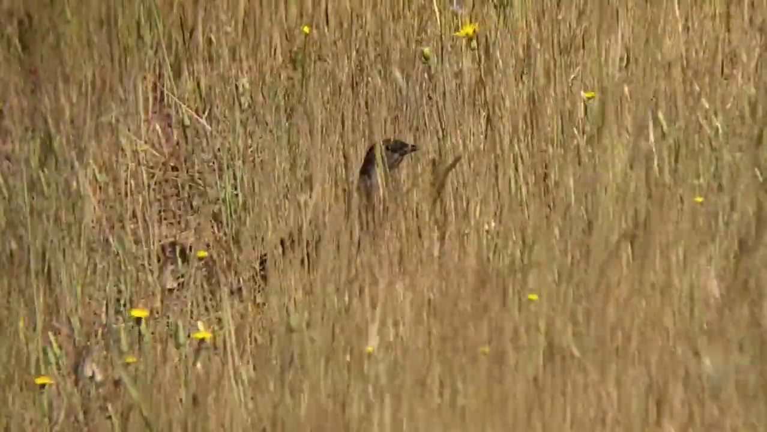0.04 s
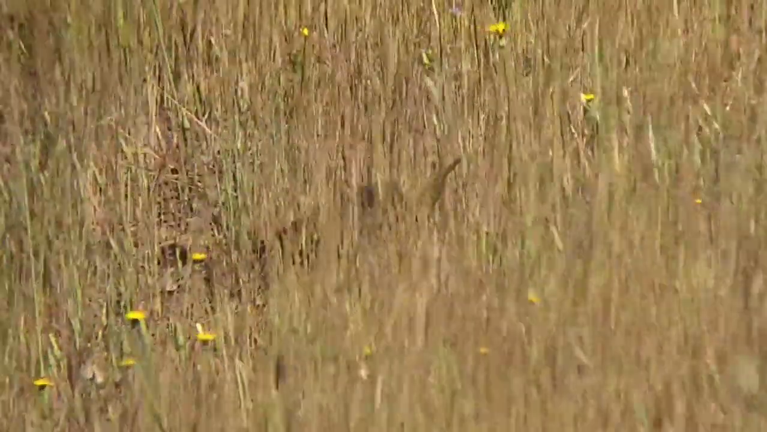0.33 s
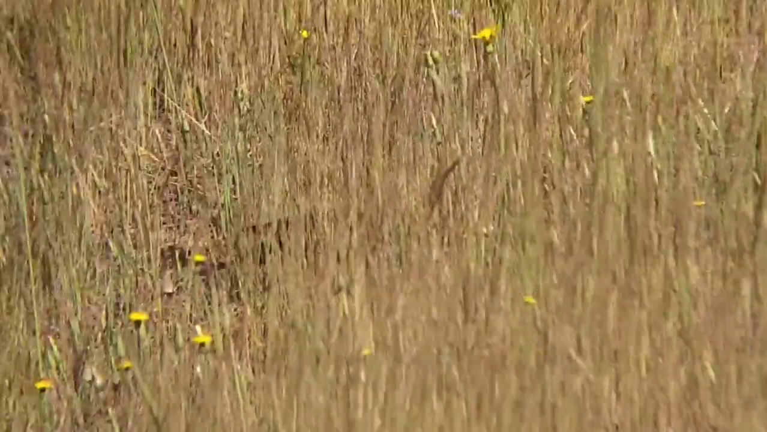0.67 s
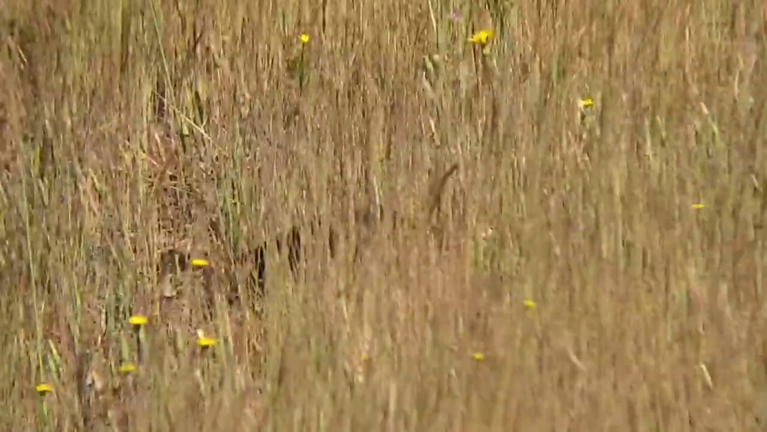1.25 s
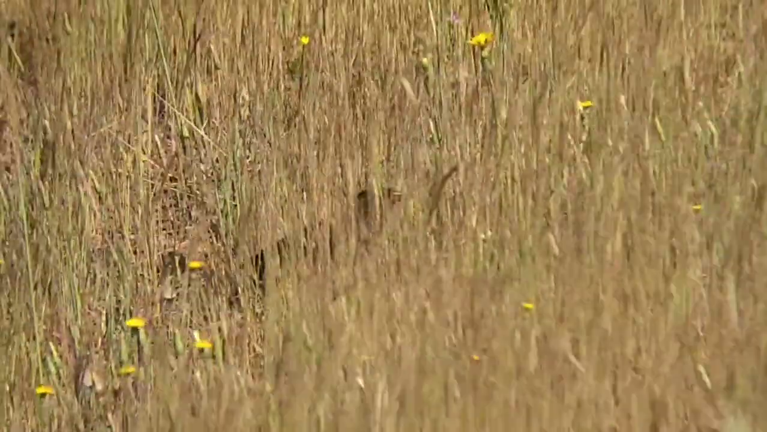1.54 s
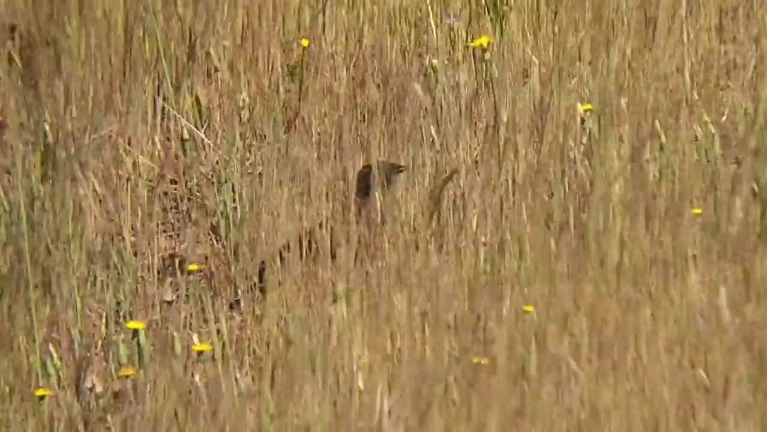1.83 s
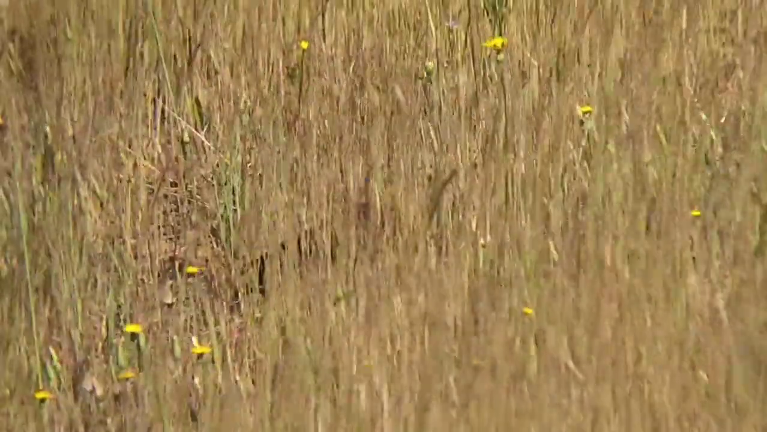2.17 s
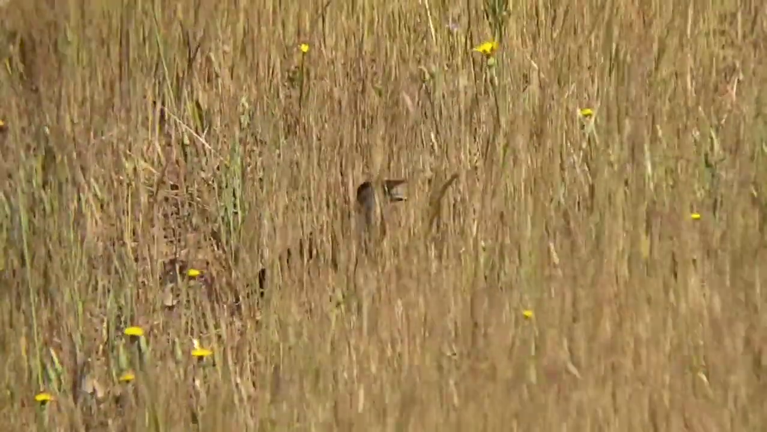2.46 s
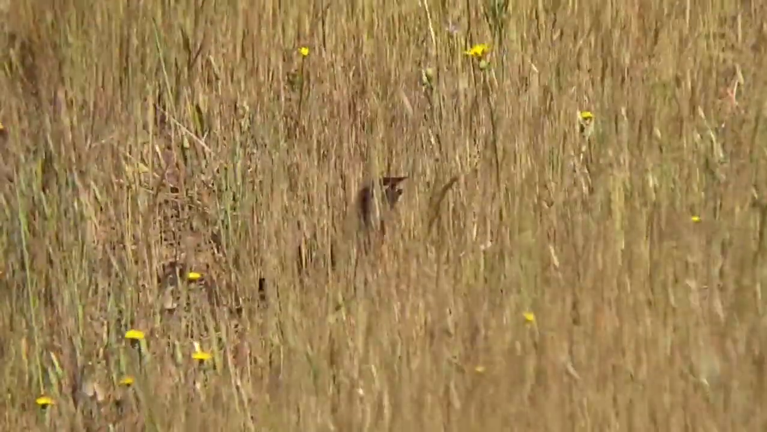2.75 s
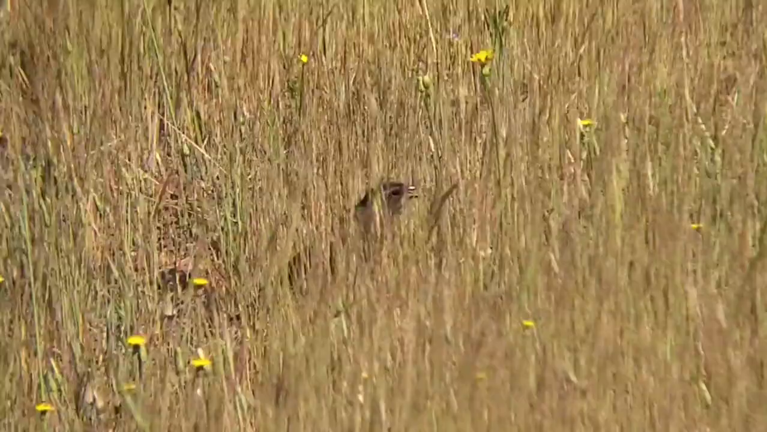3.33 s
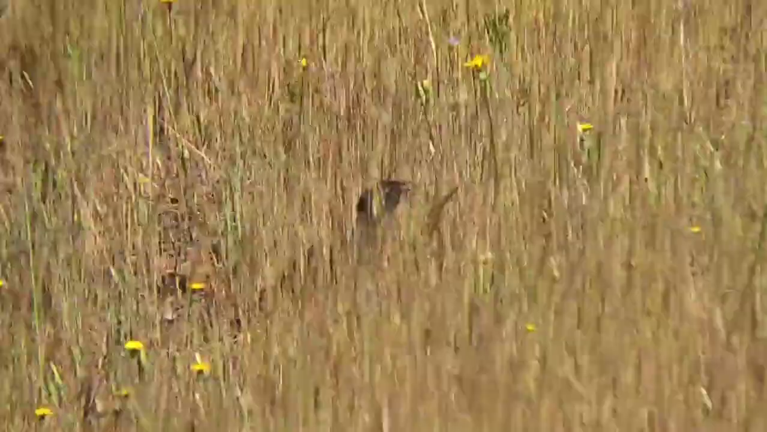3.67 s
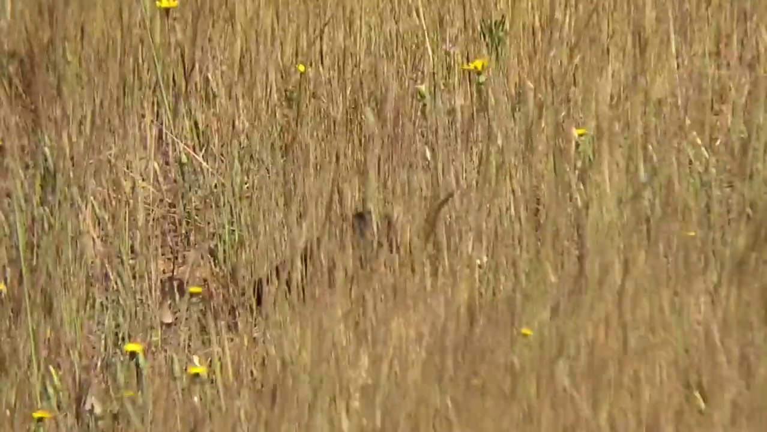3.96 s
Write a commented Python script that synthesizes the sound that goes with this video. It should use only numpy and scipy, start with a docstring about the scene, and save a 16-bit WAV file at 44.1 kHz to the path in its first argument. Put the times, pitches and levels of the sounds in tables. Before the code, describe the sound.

Sharp chips and raspy buzzes from a small bird, with faint birds and wind behind.

```python
"""A small bird in tall dry grass gives sharp chips and harsh buzzes. Each buzz is frequency modulation: one
whistle swept up and down some seventy times a second, coloured by the resonance of the throat and scattered by
the grass. Thin low peeps lead into and out of each buzz. Other birds chip and whistle far off across the
meadow. Behind them lie a steady hush, the rumble of wind on the microphone, and a distant engine that speeds up
and draws nearer."""
import sys
import numpy as np
from scipy import signal
from scipy.fft import rfft, irfft
from scipy.io import wavfile
from scipy.ndimage import uniform_filter1d

SR = 44100
rng = np.random.default_rng(int(sys.argv[2]) if len(sys.argv) > 2 else 0)


def bounce(signal):
    """Save signal as a 16-bit WAV file at the path given by the first command-line argument."""
    frames = np.transpose(np.atleast_2d(signal))
    limited = np.clip(frames, -1, 1)
    pcm = np.round(limited * 32767).astype(np.int16)
    wavfile.write(sys.argv[1], SR, pcm)


N = 176400
T = np.arange(N) / SR
FREQS = np.arange(N // 2 + 1) * SR / N
SIDES = np.array([[1], [-1]])  # left, right
JITTER_HZ, FLUTTER_DB = 900, 2.2  # birdsong: bandwidth of pitch jitter, spread of level flutter


def from_db(db):
    """Amplitude ratio: tenfold for every 20 dB."""
    return 10 ** (np.asarray(db) / 20)

def rms_one(x):
    """Normalisation to unit mean power."""
    return x / np.sqrt(np.mean(x ** 2) + 1e-20)

def in_time(rows):
    """Linear interpolation in time of each column after the first."""
    times, *columns = np.transpose(rows)
    return [np.interp(T, times, column) for column in columns]

def in_frequency(points):
    """Interpolation of a spectrum on a logarithmic frequency axis."""
    hz, value = np.transpose(points)
    return np.interp(np.log(FREQS + 1), np.log(hz), value)

def during(rows):
    """Trapezoidal window over a curve's span, with 3.6 ms ramps."""
    return np.clip(np.minimum(T - rows[0][0], rows[-1][0] - T) / 0.0036, 0, 1)

def drift(bandwidth_hz):
    """Random modulation: low-pass Gaussian noise of unit rms."""
    return rms_one(irfft(rfft(rng.standard_normal(N)) / (1 + (FREQS / bandwidth_hz) ** 2), N))

def phase_of(hz):
    """Phase is the time integral of angular frequency."""
    return 2 * np.pi * np.cumsum(hz) / SR

def air_noise(spectrum):
    """Partial coherence: coloured stereo noise of unit rms, alike in the bass, unrelated in the treble."""
    # likeness of left and right: (frequency [Hz], correlation [-1 to 1])
    correlation = [(30, 0.018), (120, 0.66), (300, 0.83), (600, 0.68), (1000, -0.041), (1600, 0.11),
                   (2600, -0.069), (5000, -0.036), (12000, -0.076)]
    alike = in_frequency(correlation)
    mid, side = rfft(rng.standard_normal((2, N)))
    stereo = np.sqrt(1 + alike) * mid + np.sqrt(1 - alike) * side * SIDES
    band_limits = 1 / (1 + (FREQS / (2 * spectrum[-1][0])) ** 4) * FREQS / (FREQS + 10)
    return rms_one(irfft(band_limits * from_db(in_frequency(spectrum)) * stereo, N))

def scatter(x, t60_s):
    """Scattering by stems and ground: convolution with decaying echoes, different at each ear."""
    t = T[:SR]
    echoes = rng.standard_normal((2, SR)) * from_db(-60 * t / t60_s) * (1 - np.exp(-t / 0.001))
    echoes /= np.sqrt(np.sum(echoes ** 2, axis=1, keepdims=True))
    return signal.fftconvolve(np.atleast_2d(x), echoes, axes=1)[:, :N]

def hush():
    """Stationary noise: the far hush of open country, slightly to the right."""
    # hush spectrum: (frequency [Hz], relative density [dB])
    spectrum = [(88, -26), (150, -6.5), (182, -12.5), (396, -8), (572, -18), (722, -4.5), (1340, -6),
                (2360, -17.5), (3220, -23), (3690, -26.5), (6470, -36.5), (7410, -41), (8830, -65.5),
                (12000, -48.5), (15500, -63.5)]
    return from_db(-48.5 - .5 * SIDES) * air_noise(spectrum)

def wind():
    """Turbulence on the microphone: low-frequency noise, amplitude-modulated by gusts."""
    # gust envelope: (time [s], relative level [dB])
    gusts = [(0.0, -25.5), (0.3, -50), (0.37, -29), (0.43, -50.5), (0.54, -29), (0.67, -40), (0.73, -23.5),
             (0.76, -43), (0.88, -24), (0.96, -47), (1.07, -37), (1.22, -49.5), (1.27, -33.5), (1.54, -56),
             (1.58, -27.5), (1.75, -32.5), (1.8, -43), (1.94, -31), (2.24, -45), (2.47, -28), (2.49, -32.5),
             (2.91, -38.5), (3.49, -30), (3.62, -25.5), (3.75, -35.5), (4.0, -31)]
    # rumble spectrum: (frequency [Hz], relative density [dB])
    spectrum = [(20, -8), (35, -8.5), (55, 2), (75, 1), (105, -10), (150, -23), (250, -29), (500, -44.5)]
    gain_db, lump_db = -1.5, 1.5
    return from_db(gain_db + in_time(gusts)[0] + lump_db * drift(14)) * air_noise(spectrum)

def vehicle():
    """Engine orders, multiples of half the firing rate, rise together while tyre noise swells."""
    # engine speed: (time [s], firing rate [Hz])
    firing = [(2.2, 58), (2.53, 67), (2.66, 76), (2.85, 86), (3.11, 98), (3.35, 102.5), (3.6, 106),
              (3.8, 111), (4.0, 119)]
    # engine envelope: (time [s], level [dB])
    engine_level = [(2.2, -49.5), (2.55, -43.5), (2.8, -35.5), (3.1, -36), (3.35, -41), (3.6, -39),
                    (3.8, -41), (4.0, -38.5)]
    # engine orders: (multiple of the firing rate [ratio], relative level [dB])
    orders = [(.5, -5), (1, 2.5), (1.5, -17.5), (2, -13), (2.5, -19), (3, -16), (3.5, -23)]
    # tyre and road noise envelope: (time [s], level [dB])
    road_level = [(0, -65), (1.4, -57), (2.2, -51.5), (2.8, -48), (3.4, -44), (3.75, -40.5), (4.0, -39.5)]
    # tyre and road noise spectrum: (frequency [Hz], relative density [dB])
    road_spectrum = [(40, -15.5), (110, -7), (180, 1), (280, -2.5), (400, -10), (600, -10), (1200, -12),
                     (2200, -16), (4000, -23.5), (7000, -36), (10000, -55.5), (15000, -47.5)]
    phase = phase_of(in_time(firing)[0] * (1 + .004 * drift(6.37)))
    note = 0
    for order, db in orders:
        flicker_db = (1.25 if order == 1 else 2.5) * drift(3)
        note += from_db(db + flicker_db) * np.sin(order * phase + rng.uniform(0, 2 * np.pi))
    road = from_db(in_time(road_level)[0]) * air_noise(road_spectrum)
    return np.sqrt(2) * from_db(in_time(engine_level)[0]) * note + road

def faint_calls():
    """Frequency-modulated tones, blurred by reverberation: chips, trills and a long falling whistle from far
    off, and thin low peeps leading into and out of the near bird's buzzes."""
    # arched chips: (centre time [s], top pitch [Hz], peak level [dB])
    arches = [(.035, 2780, -54), (0.138, 2660, -55.5), (0.187, 2830, -55), (.295, 2690, -58),
              (0.342, 2840, -53.5), (0.594, 3030, -61), (0.716, 5210, -58.5), (0.854, 5320, -58.5),
              (.94, 5100, -65), (1.011, 5160, -61), (1.16, 5140, -60), (1.305, 5010, -61),
              (1.399, 3440, -61), (1.473, 4950, -54), (1.549, 3510, -61), (1.635, 5060, -52),
              (1.734, 5970, -70), (1.83, 6550, -66), (1.924, 6090, -60)]
    # whistles and trills, with thin low peeps around the near bird's buzzes: (onset [s], length [s], # first
    # pitch [Hz], last pitch [Hz], peak level [dB], trill depth [Hz])
    notes = [(.17, 0.05, 2200, 2220, -54.5, -4), (0.284, 0.028, 4440, 4500, -62, 0),
             (0.365, 0.032, 3335, 3250, -52, -4), (0.389, 0.081, 2860, 3080, -50, -3),
             (0.53, 0.045, 6550, 6480, -73, 2), (0.558, 0.05, 5370, 5330, -70, -3),
             (0.627, 0.082, 2800, 2580, -59.5, -2), (0.752, .065, 4150, 3750, -54.5, 400),
             (.925, 0.038, 2820, 2800, -54, -4), (0.962, 0.082, 5320, 5300, -65, 5),
             (1.725, 0.18, 4440, 4300, -62, 444), (1.935, 0.079, 4430, 3650, -58.5, 449),
             (2.023, 0.095, 3790, 3350, -50.5, 266), (2.468, 0.075, 4220, 3750, -51, 142),
             (2.632, 0.04, 2730, 2760, -55.5, -2), (2.721, 0.035, 2820, 2650, -47.5, 2),
             (2.907, 0.029, 2790, 2686, -47.5, 5), (3.019, 0.034, 2650, 2900, -46.5, 0),
             (3.07, 0.048, 2810, 2740, -47.5, -1), (3.44, 0.096, 5620, 5600, -56.5, -5),
             (3.523, 0.043, 2760, 2700, -53, 0), (3.741, 0.028, 2930, 2900, -49, 19),
             (3.857, 0.028, 2750, 2820, -53, -4)]
    # falling whistle: (time [s], pitch [Hz], level [dB])
    falling = [(3.155, 5800, -60), (3.18, 5850, -40), (3.215, 5420, -63), (3.27, 4750, -48),
               (3.31, 4250, -49), (3.38, 3560, -47), (3.44, 3356, -40.5), (3.515, 3304, -46),
               (3.545, 3300, -66)]
    chip_s, trills_per_s = .044, 57
    song, waver, jitter = np.zeros(N), 1 + .0031 * drift(210), drift(JITTER_HZ)
    for centre, top_hz, db in arches:
        span = np.abs(T - centre) < chip_s / 2
        offset = 2 * (T[span] - centre) / chip_s
        hz = top_hz * (1 - .22 * offset ** 2 + .015 * jitter[span])
        song[span] += from_db(db) * np.cos(np.pi / 2 * offset) * np.sin(phase_of(hz))
    for onset, length, first_hz, last_hz, db, trill_hz in notes:
        span = (T > onset) & (T < onset + length)
        progress = (T[span] - onset) / length
        trill = np.sin(2 * np.pi * trills_per_s * length * progress) + .6 * jitter[span]
        hz = first_hz + (last_hz - first_hz) * progress + trill_hz * trill
        envelope = from_db(db) * np.sqrt(np.abs(np.sin(np.pi * progress)))
        song[span] += envelope * np.sin(phase_of(hz * waver[span]))
    hz, db = in_time(falling)
    song += from_db(db) * during(falling) * np.sin(phase_of(hz * waver))
    return song + from_db(-3.5) * scatter(song, t60_s=.26)

def throat(source):
    """Source-filter model: the throat resonates, the bill damps the treble; the rms is then held near 1."""
    centre_hz, width_hz, throat_leak = 4650, 900, .7
    bill_cut_hz, bill_leak = 5050, .25
    radius = np.exp(-np.pi * width_hz / SR)
    feedback = [1, -2 * radius * np.cos(2 * np.pi * centre_hz / SR), radius ** 2]
    resonance = signal.lfilter(np.array([1, 0, -1]) * (1 - radius ** 2) / 2, feedback, source)
    bill = bill_leak + (1 - bill_leak) / (1 + (FREQS / bill_cut_hz) ** 20)
    voice = irfft(rfft(throat_leak * source + resonance) * bill, N)
    power = np.abs(uniform_filter1d(voice ** 2, size=900))
    return voice / np.sqrt(power + 1e-9)

def air_leak(envelope, db):
    """Power law for the rasp's amplitude: harder notes leak disproportionately more air."""
    reference_db, growth = -43, .75
    return from_db(db) * envelope * (envelope / from_db(reference_db)) ** growth

def chips():
    """Pitch arches with period doubling. Returns the tone and the envelopes of rasp and hiss."""
    # near chips: (apex time [s], length [s], top pitch [Hz], tone level [dB], relative overtone [dB],
    # relative rasp [dB], hiss level [dB], pitch jitter [fraction])
    calls = [(2.217, 0.015, 4850, -44.5, -5.5, -17, -84, 0.1),
             (2.339, 0.018, 4860, -43, -2.5, -16.5, -64, 0.07),
             (2.45, .025, 4900, -35, -14, -19, -56.5, .05),
             (2.566, .029, 5054, -33, -13.5, -24.5, -56.5, 0.09),
             (3.905, 0.027, 4700, -38.5, -13, -15, -69, 0.06)]
    rise_share, pitch_drop, undertone_db = .44, .25, -15.5
    tone, rasp, hiss = 0, 0, 0
    jitter, flutter = drift(JITTER_HZ), from_db(FLUTTER_DB * drift(300))
    for apex, length, top_hz, db, overtone_db, rasp_db, hiss_db, roughness in calls:
        offset = np.abs(T - apex) / (length * np.where(T < apex, rise_share, 1 - rise_share))
        arch = 1 - pitch_drop * offset ** 2 * np.exp(1 - offset ** 2)
        phase = phase_of(top_hz * arch * (1 + roughness * jitter))
        partials = from_db(undertone_db) * np.sin(phase / 2) + from_db(overtone_db) * np.sin(1.5 * phase)
        shape = np.exp(-np.minimum(offset, 20) ** 1.4) * flutter
        tone += from_db(db) * shape * (throat(np.sin(phase)) + np.sqrt(2) * partials)
        rasp += air_leak(from_db(db) * shape, rasp_db)
        hiss += from_db(hiss_db) * shape
    return tone, rasp, hiss

def buzzes():
    """Frequency modulation, slow up and fast down. Returns the tone, its octave and the rasp envelope."""
    # sweep range, a curve per buzz: (time [s], top [Hz], bottom [Hz], sweep rate [1/s])
    sweeps = [
        [(2.659, 7400, 4170, 55), (2.70, 5710, 3200, 68), (2.745, 4840, 3260, 72), (2.80, 4780, 3020, 80),
         (2.86, 4750, 2916, 79), (2.935, 4170, 2850, 58)],
        [(3.033, 6530, 3700, 61), (3.06, 4996, 3500, 64), (3.11, 4910, 3610, 81), (3.16, 4650, 3267, 73),
         (3.24, 4094, 3016, 68), (3.47, 3655, 2723, 76)],
        [(3.608, 6720, 4220, 79), (3.64, 5500, 3810, 64), (3.665, 4560, 3580, 62), (3.74, 4060, 2945, 50)],
    ]
    # envelope, a curve per buzz: (time [s], relative level [dB])
    efforts = [
        [(2.65, -72), (2.664, -38.5), (2.678, -39), (2.706, -40), (2.712, -38.5), (2.768, -44), (2.81, -43),
         (2.912, -45.5), (2.945, -73)],
        [(3.025, -63), (3.047, -42), (3.157, -39.5), (3.241, -42.5), (3.323, -41.5), (3.345, -45.5),
         (3.445, -46), (3.47, -56)],
        [(3.6, -66), (3.612, -41), (3.66, -40.5), (3.666, -44.5), (3.704, -41.5), (3.745, -63)],
    ]
    # timbre, a row per buzz: (relative octave [dB], relative rasp [dB])
    colours = [(-23, -14), (-13, -14), (-30, -14)]
    rise_share, trough_db, gain_db = .7, -3.5, -.5
    tone, octave, rasp, jitter = 0, 0, 0, drift(JITTER_HZ)
    for sweep, effort, (octave_db, rasp_db) in zip(sweeps, efforts, colours):
        top, bottom, rate = in_time(sweep)
        cycle = np.cumsum(rate * (1 + .04 * drift(80)) * (T >= sweep[0][0])) / SR % 1
        ramp = np.interp(cycle, [0, rise_share, 1], [0, 1, 0])
        height = np.sin(np.pi / 2 * ramp ** 1.2) ** 2  # rounds the turning points
        hz = bottom + (top - bottom) * height * (1 + .07 * drift(128))
        phase = phase_of(hz * (1 + .03 * jitter))
        pulse = from_db(trough_db * (2 - height) + FLUTTER_DB * drift(200))
        envelope = from_db(gain_db + in_time(effort)[0]) * during(effort)
        tone += envelope * throat(pulse * np.sin(phase))
        octave += envelope * pulse * np.sin(2 * phase) * from_db(octave_db) / (1 + (hz / 4500) ** 20)
        rasp += air_leak(envelope, rasp_db)
    return tone, octave, rasp

def near_bird():
    """Direct and scattered sound: chips and buzzes with airy rasp and hiss, echoed by grass and field."""
    # rasp spectrum: (frequency [Hz], relative density [dB])
    rasp_spectrum = [(800, -1.5), (2300, 7.5), (4500, 7), (5800, -1.5), (7300, 0), (8700, -4),
                     (9800, -20.5), (15500, -32)]
    # hiss spectrum: (frequency [Hz], relative density [dB])
    hiss_spectrum = [(7000, -32), (9500, -2), (11500, -1), (13000, -3), (15000, 1), (16000, 0.5)]
    # hiss envelope, a curve per buzz: (time [s], relative level [dB])
    hiss_levels = [
        [(2.65, -89), (2.672, -69), (2.716, -64), (2.776, -79), (2.945, -83)],
        [(3.025, -84), (3.051, -67), (3.105, -63), (3.279, -77), (3.47, -81)],
        [(3.6, -82), (3.626, -71), (3.648, -69), (3.666, -79), (3.745, -82)],
    ]
    left_lag_s, tone_pan_db, treble_pan_db = .00002, -.2, 1.5
    chip, chip_rasp, chip_hiss = chips()
    buzz, octave, buzz_rasp = buzzes()
    buzz_hiss = sum(from_db(5.5 + in_time(curve)[0]) * during(curve) for curve in hiss_levels)
    tone = chip + buzz
    rasp = 2 * (chip_rasp + buzz_rasp) * air_noise(rasp_spectrum)
    hiss = (chip_hiss + buzz_hiss) * air_noise(hiss_spectrum)
    direct = np.array([np.interp(T - left_lag_s, T, tone), tone]) * from_db(tone_pan_db * SIDES)
    direct += (octave + rasp) * from_db(treble_pan_db * SIDES) + hiss
    grass = from_db(-3.5) * scatter(direct, t60_s=.087)
    field = from_db(-13) * scatter(direct, t60_s=.25)
    return direct + grass + field

def scene():
    """Superposition: the pressures of independent sources add."""
    return near_bird() + faint_calls() + vehicle() + wind() + hush()

def record(dry):
    """An elliptic low-pass filter cuts the highest treble steeply."""
    cutoff_hz = 15750
    return signal.sosfilt(signal.ellip(12, .1, 80, cutoff_hz, fs=SR, output="sos"), dry)


dry = scene()
out = record(dry)
bounce(out)
```